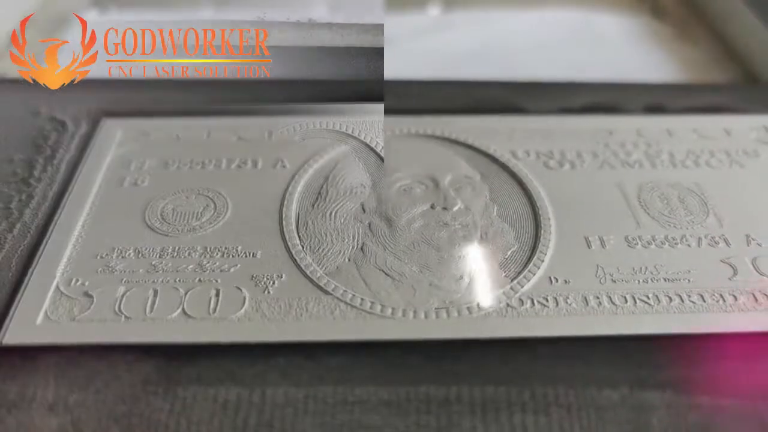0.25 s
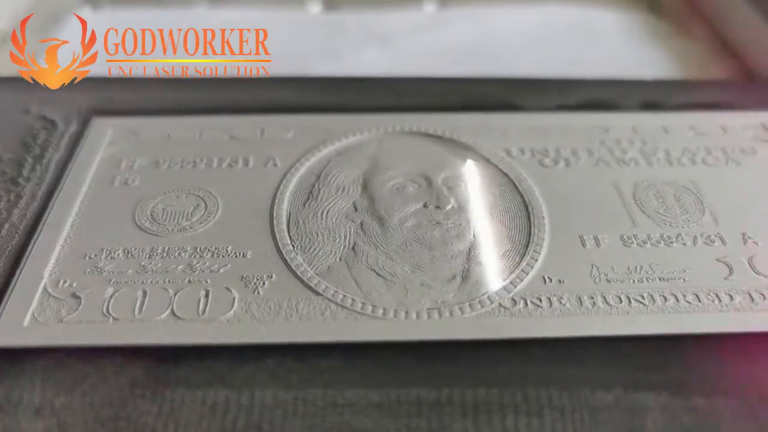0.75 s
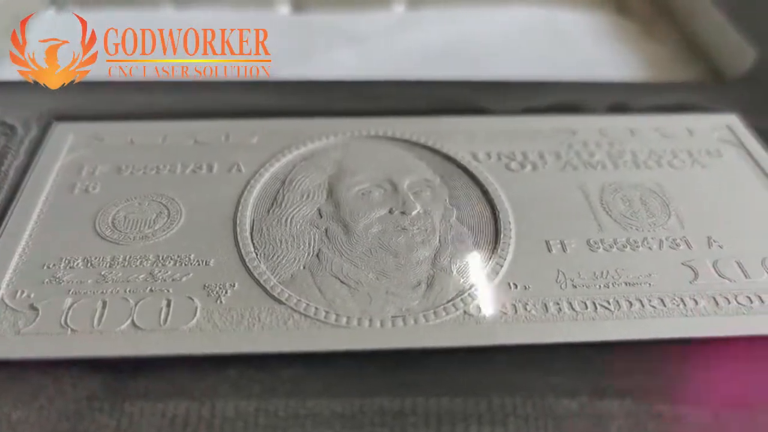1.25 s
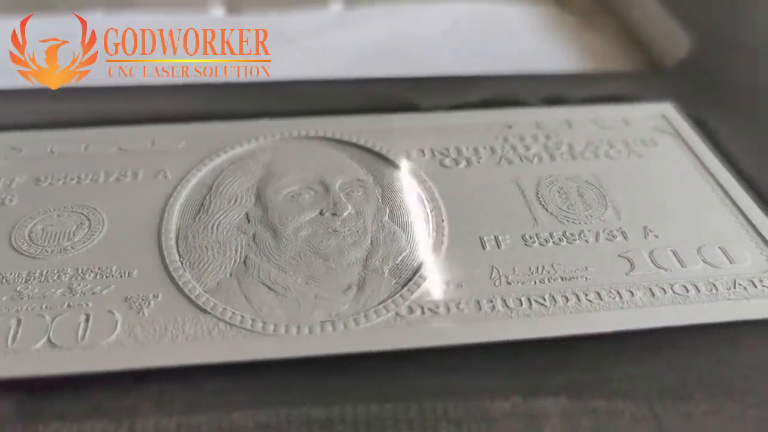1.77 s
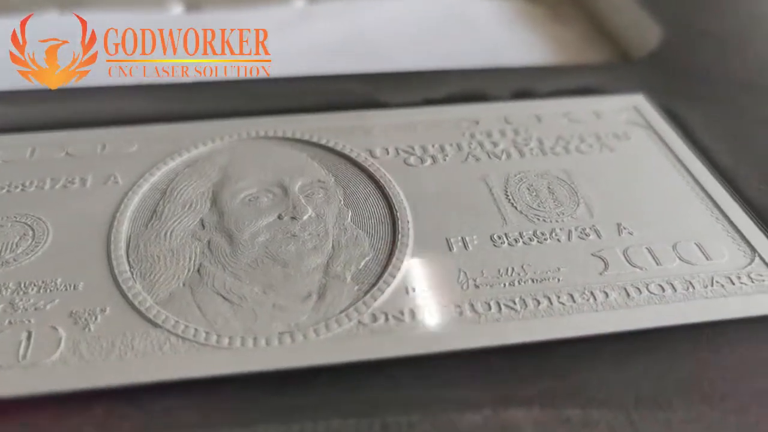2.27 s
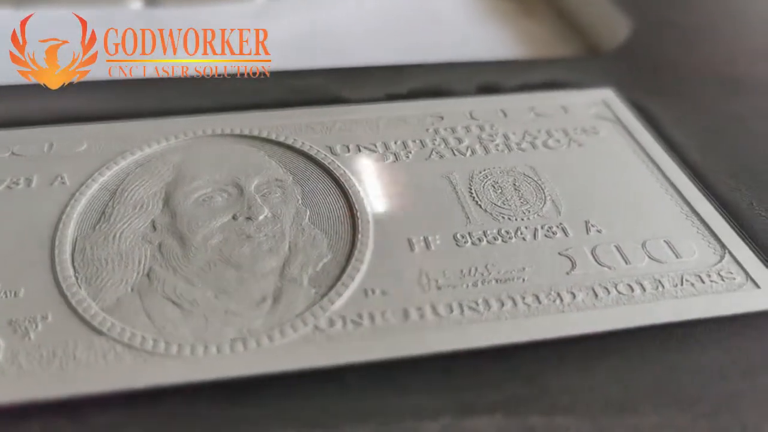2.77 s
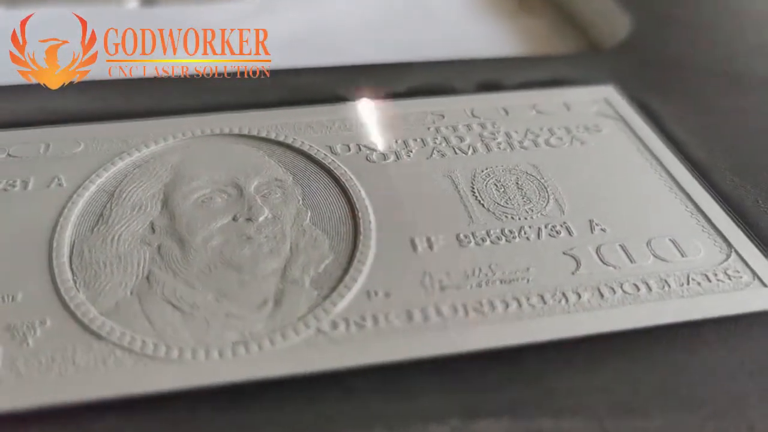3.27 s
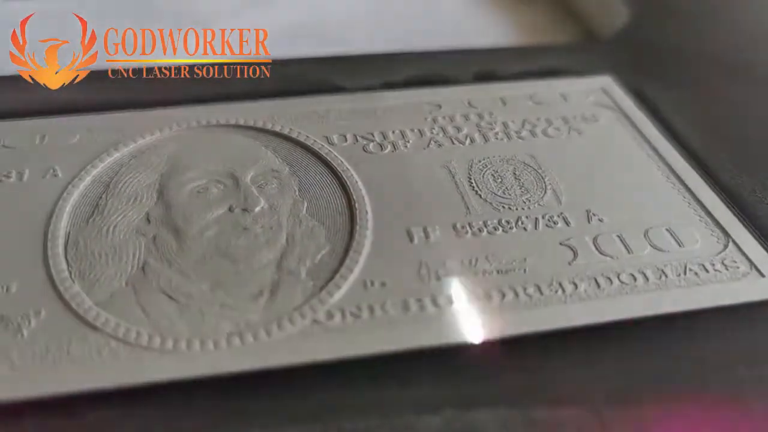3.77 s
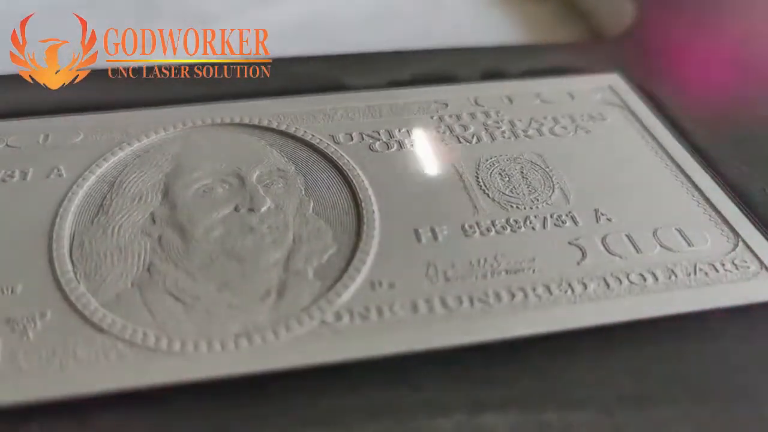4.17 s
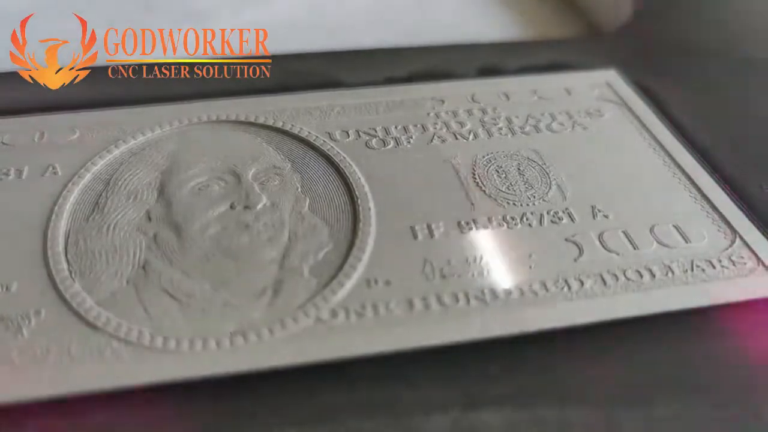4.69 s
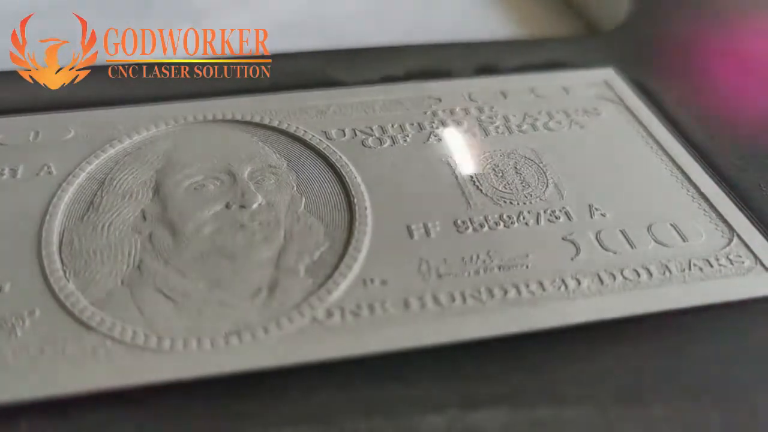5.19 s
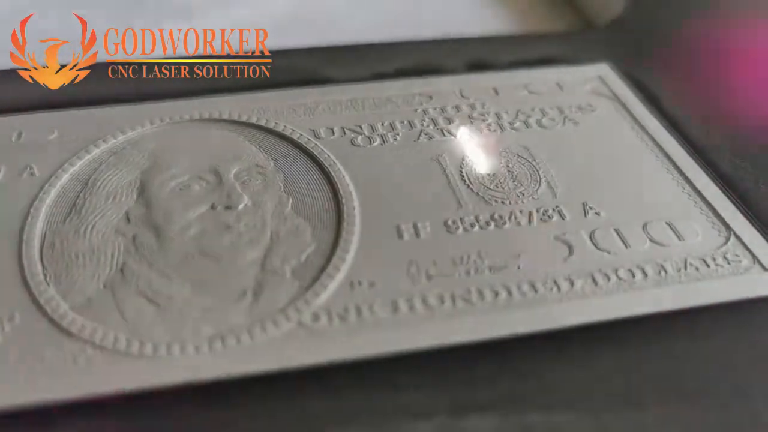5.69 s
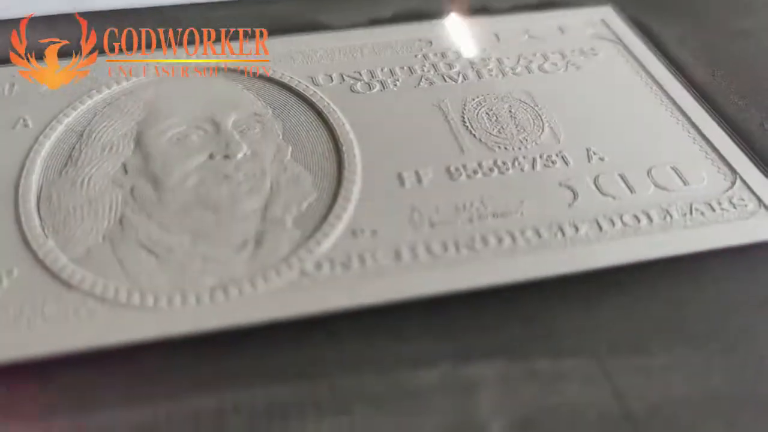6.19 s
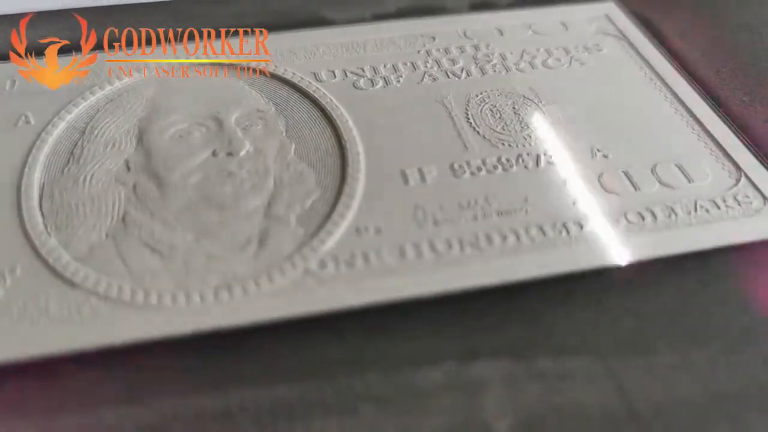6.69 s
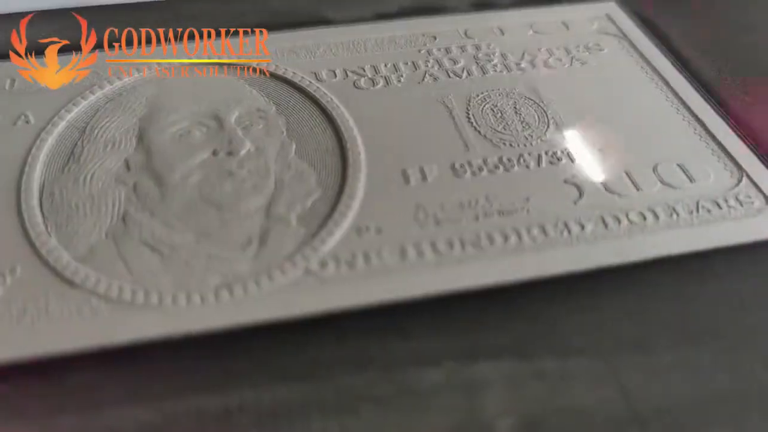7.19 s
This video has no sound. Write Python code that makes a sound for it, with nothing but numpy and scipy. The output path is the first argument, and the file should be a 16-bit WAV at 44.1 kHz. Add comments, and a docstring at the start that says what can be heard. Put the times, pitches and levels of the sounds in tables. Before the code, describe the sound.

Continuous turbulent suction noise, bright and slightly hollow, carries several thin high whining tones from a blower and second fan. Distant machinery rumbles quietly below. In the first three seconds soft low finger thuds tap the handheld phone, while its stereo image shifts and the rush gets nearer. A brief treble swell comes with a dull rub, then the noise holds steady with rare handling sounds to the end.

```python
"""A fume extractor rushes and whines over a low workshop rumble, beside a laser engraving a metal plate.
Turbulent noise rings its hose near multiples of 500 Hz; sine tones make the blower and a second fan.
At first the right port is brighter in one band; finger thuds soon bump the phone's case, rarer later on.
From 1 s the right port turns to the nozzle, which brightens that side; from 1.5 s the phone also comes closer.
From 2 s on, dull noise scrapes rub the case now and then; at 2.63 s the treble swells briefly."""
import sys
import numpy as np
from scipy import signal
from scipy.fft import rfft, irfft
from scipy.io import wavfile
from scipy.ndimage import uniform_filter1d

SR = 44100
rng = np.random.default_rng(int(sys.argv[2]) if len(sys.argv) > 2 else 0)


def to_wav(s):
    """Save 16-bit WAV."""
    ch = np.atleast_2d(s).T  # columns
    pcm = np.round(np.clip(ch, -1, 1) * 32767)  # PCM
    wavfile.write(sys.argv[1], SR, pcm.astype(np.int16))


N = 328545


def undb(db):
    """Turn decibels into amplitude gain; pass twice the decibels for a power."""
    return 10 ** (np.asarray(db) / 20)


def along(table, hz):
    """Read a (frequency, value) table on a log-frequency axis."""
    at, value = np.transpose(table)
    return np.interp(np.log(hz + 1), np.log(at), value)


def over(table, x):
    """Read a two-column table in straight lines, holding its end values."""
    at, value = np.transpose(table)
    return np.interp(x, at, value)


def spectrum_hz():
    """Frequencies of the bins of a full-length spectrum."""
    return np.arange(N // 2 + 1) * SR / N


def coloured(power):
    """Shape white noise to the given power per Hz."""
    white = rfft(rng.standard_normal(N))
    return irfft(white * np.sqrt(power * SR / 2), N)


def walk(rate):
    """Random levels held 1 / rate seconds and smoothed twice; spread near 1."""
    hold = int(SR / rate)
    steps = np.repeat(rng.standard_normal(N // hold + 1), hold)
    smooth = uniform_filter1d(uniform_filter1d(steps, hold), hold)
    return 1.3 * smooth[:N]


def patchy(shape, size, count):
    """Chance that varies slowly over size time frames and count neighbouring bands; spread 1."""
    v = uniform_filter1d(rng.standard_normal(shape), size=size, axis=1)
    v = uniform_filter1d(v, size=count, axis=0)
    return v / v.std()


# workshop rumble: (frequency [Hz], level [dB per Hz])
RUMBLE_COLOUR = [(25, -93.5), (60, -93), (130, -84.5), (220, -85.5), (350, -94.5), (600, -103),
                 (1500, -109)]


def rumble():
    """Distant machines as low noise, partly alike at both ports, with shares that vary with frequency."""
    hz = spectrum_hz()
    power = undb(2 * along(RUMBLE_COLOUR, hz))
    # (frequency [Hz], share that differs between the ports [0-1])
    apart = np.clip(along([(60, 0.39), (140, 0.16), (230, 0.37), (400, 0.3)], hz), 0, 1)
    alike = coloured(power * (1 - apart))
    own = np.array([coloured(power * apart), coloured(power * apart)])
    return alike + own * undb([[-1.2], [1.2]])  # the right port's own part is the louder


# the hand shifts on the case: (time [s], half length [s], level [dB])
RUSTLES = [(2.1, .04, -52), (2.64, 0.085, -44), (4.7, 0.033, -51), (5.462, .05, -47), (6.02, .04, -49)]
# colour of a rustle: (frequency [Hz], level [dB])
RUSTLE_COLOUR = [(60, -25), (200, -6), (700, 0), (1200, 0), (3000, -14), (5000, -10), (9000, -29)]


def rustles():
    """Skin scrapes the case: short bell-shaped bursts of dull noise, partly alike at both ports."""
    t = np.arange(N) / SR
    power = undb(2 * along(RUSTLE_COLOUR, spectrum_hz()))
    skin = coloured(power) + 0.54 * np.array([coloured(power), coloured(power)])
    envelope = sum(undb(db) * np.exp(-((t - s) / half_s) ** 2) for s, half_s, db in RUSTLES)
    return skin / skin.std() * envelope


# fingers bump the case: (time [s], level [dB], pitch [Hz], left minus right [dB])
BUMPS = [(0.605, -54, 120, -10), (0.66, -55, 128, -10), (0.827, -53, 204, -16), (0.95, -56, 130, -11),
         (1.112, -54, 156, -5), (1.426, -52, 161, -11), (1.688, -47, 208, -10), (1.95, -52, 130, 0),
         (2.279, -49, 300, 0.5), (2.617, -54, 289, -0.5), (3.797, -45, 301, 0.0), (6.021, -48, 272, -1)]


def bumps():
    """Fingers thud in the phone's body: low sines with a soft onset and a quick decay."""
    out = np.zeros((2, N))
    t = np.arange(SR // 10) / SR
    for s, db, hz, pan_db in BUMPS:
        start = int(s * SR)
        thud = np.sin(2 * np.pi * hz * t) * (t / 0.0076) * np.exp(1 - t / 0.0071)
        port_db = db + np.array([[pan_db], [-pan_db]]) / 2
        out[:, start:start + len(t)] += undb(port_db) * thud
    return out


# blower speed: (time [s], second blade tone [Hz], the last of the shaft multiples)
BLADES_HZ = [(0, 9550), (.3, 9575), (2.5, 9570), (4.3, 9584), (5, 9577), (6, 9581), (6.5, 9565), (7, 9570),
             (7.45, 9580)]
# blower tones: (multiple of the shaft turn)
SHAFT_MULTIPLES = [1, 2, 3, 10, 12, 24]
# blower tones, a row per multiple: (left [dB], right [dB]), relative to the air level
BLOWER = [(-18, -31), (-23.5, -23.5), (-31, -30), (-13.5, -11.5), (-18, -15.5), (-17.5, -15)]
# tones of a second fan: (frequency [Hz])
FAN_HZ = [767, 1782, 2484, 2778, 3590, 3622]
# tones of the second fan, a row per frequency: (left [dB], right [dB]), relative to the air level
FAN = [(-30, -32), (-18.5, -15), (-24, -22), (-22.5, -16.5), (-19, -18), (-20, -19)]
# pitch waver of the blower tones, then the fan tones: (spread [share of the pitch])
WAVER = [.0004] * len(BLOWER) + [.002, .003, .002, .0007, .0007, .0007]


def whine():
    """Shaft and blade tones follow the blower speed, a second fan holds its own; all waver a little."""
    shaft_hz = over(BLADES_HZ, np.arange(N) / SR) / SHAFT_MULTIPLES[-1]
    tones_hz = [m * shaft_hz for m in SHAFT_MULTIPLES] + FAN_HZ
    out = np.zeros((2, N))
    for hz, db, waver in zip(tones_hz, BLOWER + FAN, WAVER):
        phase = 2 * np.pi * np.cumsum(hz * (1 + waver * walk(25))) / SR
        level_db = np.array(db)[:, None] + 1.15 * walk(12)
        out += undb(level_db) * np.sqrt(2) * np.sin(phase)
    return out


# hose and nozzle resonances:
# (frequency [Hz], width [Hz], level [dB per Hz, relative to the air level], right port's extra [dB])
HOSE = [(482, 25, -31, -5.3), (517, 40, -24.4, -5.3), (989, 42, -27.4, -4.7), (1482, 80, -27.5, -2.0),
        (1988, 84, -30.8, -3.0), (2474, 100, -30.3, 2.7), (2938, 132, -25.6, 2.7), (3068, 159, -23.7, 0.5),
        (3520, 257, -31.3, 1.3), (3940, 275, -28.2, 3.7), (4472, 221, -35.1, 2.3), (4970, 307, -30.5, 0.2),
        (5412, 107, -36.9, 1.3), (5756, 100, -35.2, 3.5), (6479, 150, -38.6, -0.0), (6972, 145, -34.5, 2.4),
        (7667, 288, -33.5, 2.2), (7900, 230, -32.3, 0.6), (9235, 267, -37.3, -1.9),
        (10097, 381, -41.1, 5.4), (10830, 330, -32.7, 7.8), (11929, 693, -36.9, 8.0),
        (12745, 121, -37.8, 4.9), (13450, 200, -42, 6), (13970, 522, -36.6, 0.4), (14771, 540, -36.5, 0.7)]
# broad rush between the resonances: (frequency [Hz], level [dB per Hz, relative to the air level])
RUSH = [(30, -66), (120, -58), (300, -45.2), (800, -43.5), (2200, -40.5), (3400, -31.8), (4700, -45.4),
        (5600, -32.8), (6300, -41.1), (7300, -40.5), (8600, -65.1), (9700, -40.7), (10400, -65.8),
        (11200, -40.3), (12500, -45.4), (13300, -39.3), (15500, -36.0)]
# narrow dips in the colour of the whole flow noise, ringing and rush alike: (frequency [Hz], width [Hz], depth
# [dB])
DIPS = [(880, 40, 2.5), (1150, 50, 2), (2200, 200, 1.5), (2680, 90, 4), (3690, 80, 2), (4210, 100, 1.5),
        (4690, 80, 3), (6270, 110, 4), (10470, 120, 3), (11120, 120, 3), (12550, 130, 3.5)]


def air(ring_table, rush_table):
    """Turbulence rings the hose; each port hears the straight sound and its own scattered sound."""
    hz = spectrum_hz()
    ring = 0
    for f, width, db, right_db in HOSE:
        peak = undb(2 * np.array([[db], [db + right_db]]))
        ring = ring + peak / (1 + (2 * (hz - f) / width) ** 2) ** 1.5
    rush = undb(2 * along(RUSH, hz))
    ring_share = np.clip(along(ring_table, hz), 0, 1)
    rush_share = np.clip(along(rush_table, hz), 0, 1)
    straight = coloured(ring_share * ring + rush_share * rush)
    scattered = np.array([coloured((1 - ring_share) * r + (1 - rush_share) * rush) for r in ring])
    dips = undb(-sum(db * np.exp(-((hz - f) / width) ** 2) for f, width, db in DIPS))
    flutter = undb(0.11 * walk(13) + 0.65 * walk(50))  # eddies at the nozzle shake the whole flow
    return flutter * irfft(rfft(straight + scattered) * dips, N)


# phone distance: (time [s], air level at the left port [dB])
NEAR = [(0, -41.5), (1.5, -42), (2, -39.5), (2.5, -37), (3.3, -37.5), (3.45, -36.5), (7.45, -36.5)]
# change of colour with distance: (frequency [Hz], gain [dB per dB of air level above CLOSE_DB])
FAR_COLOUR = [(400, -0.42), (1200, -0.35), (3000, -0.07), (5500, 0.55), (7900, -0.02), (8600, -0.5),
              (9300, 1), (10000, -.2), (10900, 0), (11600, -0.5), (12500, -0.8), (13500, 0.2), (14500, 0.3)]
CLOSE_DB = -37  # air level at which the distance adds no colour


def left_level(hz, t):
    """Distance sets the left port's level and colour; the treble swells once, narrow bands on their own."""
    air_db = over(NEAR, t)
    left_db = air_db + np.outer(along(FAR_COLOUR, hz), air_db - CLOSE_DB)
    swell_db = 5 * np.exp(-((t - 2.63) / 0.019) ** 2)  # peak [dB], time and width [s]
    left_db += np.outer(np.interp(hz, [3000, 4700], [0, 1]), swell_db)
    band_db = np.interp(hz, [500, 700, 870, 1000, 2500, 5000], [0.44, 2.0, 3.7, 1.5, 1.2, 1.3])
    return left_db + band_db[:, None] * patchy(left_db.shape, size=5, count=3)


# shadow of the phone's body: (frequency [Hz], left minus right at turn 0, 1, 2 and 3 [dB each])
SHADE = [(1440, 3.5, 1, 0.1, -1.5), (2870, 2.5, -2, -2.5, -4), (4600, -3, -5.5, -6.5, -6.5),
         (5500, -3, -8.5, -8, -10), (8020, 0, -10.5, -13, -11.5), (8350, 7, -8, -12, -13),
         (9140, -1.5, -9, -10.5, -11), (11000, 6, -7.5, -13.5, -16), (11270, 4.5, -3.5, -14, -21),
         (12800, 13, 5.5, -11.5, -16), (14500, 10, 4, 0, 1), (15700, 16, 16, -3.2, -1)]
# the top treble drifts between the ports: (time [s], added left minus right [dB])
TOP_DRIFT = [(3.4, -3), (4.1, -5), (5.1, -0.5), (6.2, 5.5), (7.272, 1), (7.28, -2)]


def body_shade(hz, t, turn):
    """The phone's body shades one port by its turn; returns left minus right in dB."""
    at, *steps = np.transpose(SHADE)
    shade_db = 0
    for k, db in enumerate(steps):
        nearness = np.clip(1 - abs(turn - k), 0, 1)  # blends neighbouring steps
        shade_db = shade_db + np.outer(np.interp(hz, at, db), nearness)
    shade_db += np.outer(hz > 12200, over(TOP_DRIFT, t))
    # at first the right port is 13 dB brighter around 9600 Hz, fading out by 0.41 s
    bright_band = np.exp(-((hz - 9600) / 700) ** 2)
    return shade_db - 13 * np.outer(bright_band, np.clip(1 - t / 0.41, 0, 1))


# the way round the phone's body: (frequency [Hz], lead of the left port [rad])
PORT_PHASE = [(0, 0), (1210, .3), (1460, .8), (1810, .1), (2700, 2.3), (3200, 2.4), (3700, 1.9),
              (4150, 2.3), (4300, 3.0), (4600, 3.12), (5170, 3.2), (5500, 3.5), (7750, 5.9), (8530, 7.6),
              (9560, 7.7), (10900, 8.9), (12700, 12.3), (16600, 12.6)]
# added lead of the left port while the right is turned away: (frequency [Hz], lead [rad])
AWAY_PHASE = [(0, 0.3), (3000, 0.33), (3700, 0.57), (4150, 0.68), (4450, 0.068), (4900, 1.2), (6000, 1.15),
              (8000, 1.1), (9500, 1.7), (12000, 3.2), (13000, 3.4), (15500, 7.4)]
# random spread of the phase between the ports, by band: (frequency [Hz], share [0-1])
SPREAD_BAND = [(0, 0), (3600, .2), (4200, 1), (5300, 1), (6000, .25), (8000, .25), (8600, .7), (10200, .7),
               (10800, .25), (16600, .25)]
# random spread of the phase between the ports, by time: (time [s], spread [rad])
SPREAD_RAD = [(0, 1.1), (.35, .7), (.7, .45), (1, .15), (2.1, .15), (2.5, .5), (2.8, .2), (3.3, .25),
              (3.6, .6), (6.2, .6), (6.6, .35), (7.45, .3)]


def left_lead(hz, t, turn):
    """The way round the body delays the right port; returns the left port's lead with its random spread."""
    away = np.clip((1.62 - turn) / 0.77, 0, 1)  # gone at turn 1.62, fading over 0.77 of a step
    lead = over(PORT_PHASE, hz)[:, None] + np.outer(over(AWAY_PHASE, hz), away)
    chance = patchy(lead.shape, size=16, count=5)
    return lead + np.outer(over(SPREAD_BAND, hz), over(SPREAD_RAD, t)) * chance


# phone turn: (time [s], steps of turning the right port to the nozzle [0 away - 3 facing])
TURN = [(0, -0.02), (.6, 0), (1, 0), (1.3, 0.55), (1.9, 1.0), (2.25, 1.08), (2.63, 1.5), (2.85, 1.64),
        (3.3, 1.58), (3.6, 1.67), (4.5, 1.76), (5.6, 2), (7.272, 2.0), (7.28, 1), (7.31, 3), (7.45, 3)]
# fixed colour of the right port against the left: (frequency [Hz], level [dB])
RIGHT_PORT = [(300, 0), (700, .5), (1200, 0), (1780, 3.2), (3100, -5), (4500, -7.3), (6000, -3.4),
              (7300, -2.7), (8600, 3.9), (9600, -.7), (10400, -8.6), (11200, -7.9), (12500, -2.4),
              (13200, -1.6), (15500, -2.3)]


def ports(sound):
    """Shape level, body shadow and phase of the extractor at each port, band by band over time."""
    frame = dict(nperseg=512, noverlap=384)
    hz, t, bands = signal.stft(sound, SR, **frame)
    turn = np.clip(over(TURN, t), 0, 3)
    left_db = left_level(hz, t)
    right_db = left_db - body_shade(hz, t, turn) + along(RIGHT_PORT, hz)[:, None]
    bands[0] *= undb(left_db)
    bands[1] *= undb(right_db) * np.exp(-1j * left_lead(hz, t, turn))
    return signal.istft(bands, SR, **frame)[1][:, :N]


# with the right port facing, share of the ringing straight from the nozzle:
# (frequency [Hz], share [0-1])
STRAIGHT_RING = [(500, 0.68), (1500, 0.71), (2500, 0.2), (3000, 1), (4200, 1), (5150, 1), (5700, 0.4),
                 (7000, .5), (7700, 0.9), (8000, 0.78), (8350, .05), (8900, .05), (9300, 0.6), (10200, 0.3),
                 (10900, 0.75), (11300, .4), (12200, 0.6), (14000, 0.3), (15500, .9)]
# likewise of the rush: (frequency [Hz], share [0-1])
STRAIGHT_RUSH = [(100, 0.4), (900, 0.97), (1300, 0.98), (2100, 0.3), (3900, 0), (4250, 1), (5150, 0.98),
                 (6200, 0.4), (9000, 0.2), (13000, 0.3), (14000, 0.3), (15500, 0.9)]
# with the right port turned away, straight share of both: (frequency [Hz], share [0-1])
STRAIGHT_AWAY = [(100, .3), (500, .75), (1500, .62), (2300, .45), (3000, .9), (3500, .65), (4100, 1),
                 (4500, 1), (5000, .7), (5600, .5), (6300, .55), (7000, 1), (7600, .8), (8200, .1),
                 (8900, .1), (9300, 1), (9800, .45), (11000, .3), (12500, .45), (15500, .2)]


def scene():
    """Lay the extractor, its straight share following the phone's turn, over rumble, rustles and bumps."""
    facing = np.clip(over(TURN, np.arange(N) / SR), 0, 1)  # complete from the first step of turn
    flow = np.sqrt(facing) * air(STRAIGHT_RING, STRAIGHT_RUSH)
    flow += np.sqrt(1 - facing) * air(STRAIGHT_AWAY, STRAIGHT_AWAY)
    return rumble() + rustles() + bumps() + ports(flow + whine())


def record(dry):
    """The phone cuts the top steeply, with an elliptic low-pass."""
    top_hz = 15750
    low_pass = signal.ellip(16, 0.5, 75, top_hz, fs=SR, output="sos")  # ripple, stopband depth [dB]
    return signal.sosfilt(low_pass, dry)


dry = scene()
out = record(dry)
to_wav(out)
```